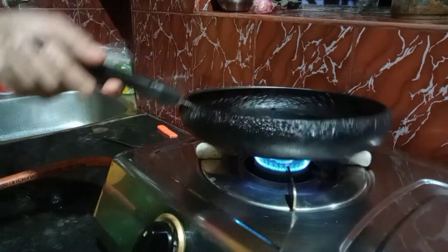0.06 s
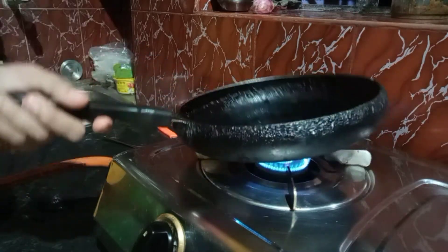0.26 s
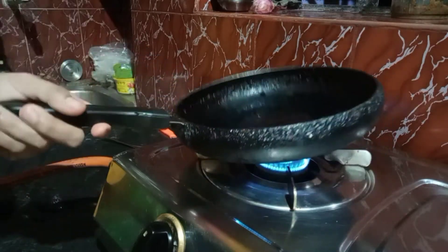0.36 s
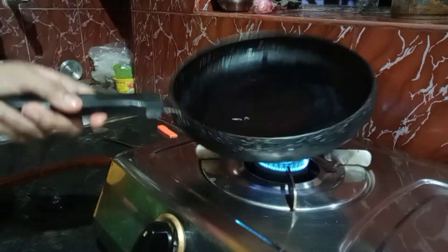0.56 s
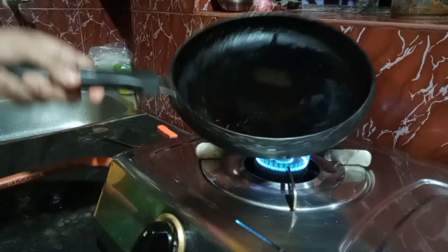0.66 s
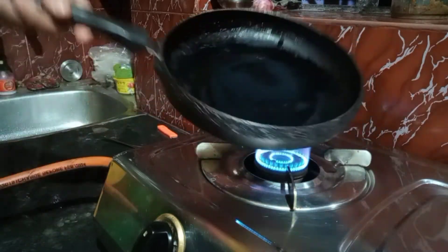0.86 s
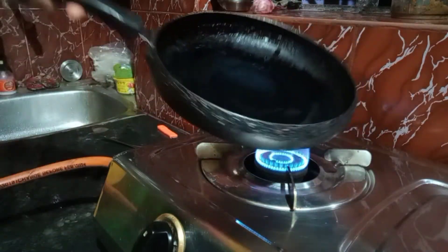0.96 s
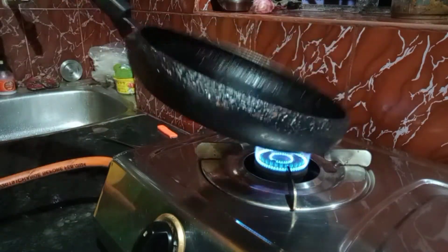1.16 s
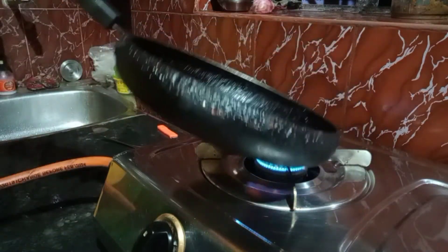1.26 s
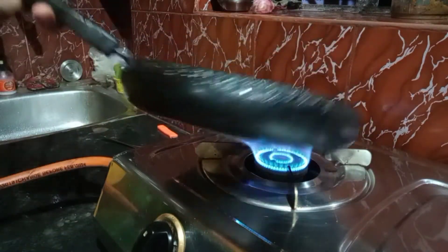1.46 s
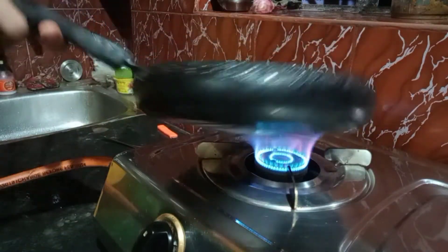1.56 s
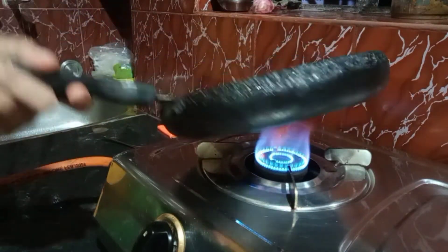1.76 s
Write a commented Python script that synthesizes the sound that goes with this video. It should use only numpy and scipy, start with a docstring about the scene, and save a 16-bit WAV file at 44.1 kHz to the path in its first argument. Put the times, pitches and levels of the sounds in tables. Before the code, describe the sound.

Frying pan dragged over a stove grate with clanks, a thin edge scrape and a bright ting

```python
"""A pan is swirled over a lit gas ring in a small tiled kitchen; the flame, filtered noise, burns throughout.
First the base drags and knocks on the grate: random slips and short contacts ring the pan and the stove.
Then the tilted edge slides with a thin rasp of fine grains, and the rim slips off with a ting of pure modes.
Last the pan drops back, knocks and drags again. Wavering tones squeak and small rim ticks fall along the way."""
import sys
import numpy as np
from scipy import signal
from scipy.fft import rfft, irfft
from scipy.io import wavfile
from scipy.ndimage import uniform_filter1d

SR = 44100
rng = np.random.default_rng(int(sys.argv[2]) if len(sys.argv) > 2 else 0)


def inscribe(sig):
    """Save sig as 16-bit PCM at rate SR to the path in sys.argv[1].

    A 1-D sig is mono; a 2-D sig holds one channel per row.
    Samples are clipped to [-1, 1] before scaling.
    """
    pcm = np.round(np.clip(np.atleast_2d(sig).T, -1, 1) * 32767)
    wavfile.write(sys.argv[1], SR, pcm.astype(np.int16))


N = 79380
T = np.arange(N) / SR

# Flame hiss and roar colours, relative: pitch_hz, level_db
HISS_COLOUR = [(25, -16), (75, -5.5), (155, 1.5), (200, -3), (300, -4.5), (450, -6), (750, -10), (900, -6),
               (1050, -11), (1400, -2), (1850, -13), (2400, -10.5), (3000, -14.5), (3750, -6.5),
               (5200, -20), (6550, 1), (8000, -20.5), (10000, -50), (12500, -32), (15500, -30)]
ROAR_COLOUR = [(30, -24), (60, -13), (90, 1.5), (125, -3), (155, -2), (200, -12), (300, -21), (700, -33),
               (2000, -64), (8000, -90)]
# Roar of the flame as the pan covers it: time_s, level_db
ROAR_LEVEL = [(0, -52), (.15, -70), (.28, -43), (.48, -53.5), (.58, -71), (.67, -58), (.8, -86), (.94, -61),
              (1.07, -64), (1.22, -63), (1.33, -50.5), (1.52, -44), (1.68, -60), (1.78, -53)]
# Sliding metal groans or squeaks on one note: start_s, length_s, pitch_hz, level_db (peak)
SQUEAKS = [(0, 0.14, 268, -39.5), (0, 0.091, 1012, -46), (0.124, .21, 271, -23.5), (0.228, 0.1, 395, -34),
           (0.165, 0.043, 678, -27.5), (0.394, 0.12, 1000, -40.5), (0.432, 0.12, 706, -47.5),
           (0.544, 0.065, 1963, -59), (0.688, 0.027, 3530, -41), (0.736, 0.042, 4095, -25),
           (1.139, 0.1, 3660, -51.5), (1.209, 0.095, 2420, -60.5), (1.345, 0.032, 1075, -28),
           (1.348, 0.083, 1359, -25.5), (1.35, 0.068, 686, -28), (1.513, .13, 365, -45.5),
           (1.62, 0.067, 4520, -54), (1.66, 0.16, 3770, -54)]
# Light ticks of the rim: start_s, level_db, ring_s (t60 given to wash)
RIM_TICKS = [(0.461, -22.5, .08), (.648, -30, 0.12), (1.526, -18, 0.031), (1.662, -26.5, .25),
             (1.759, -36, .06)]
# Modes of the rim, with starting level: pitch_hz, level_db, t60_s
RIM_MODES = [(3700, -27, 0.2), (6912, -15, .27), (7467, -12, .35), (7550, -10.5, 0.23), (10120, -18, 0.34),
             (11360, -25, 0.37), (12400, -20, 0.26), (12810, -9, 0.29), (13510, -22, .19),
             (14010, -2.5, 0.28), (14590, -9, 0.24), (15400, -8, 0.19)]
# Colour of the rim's contacts, relative: pitch_hz, level_db
TICK_COLOUR = [(1500, -20.5), (4000, -20), (7000, 4), (9500, -27), (12500, -6), (15500, -4.5)]
# Modes of stove top with grate, and of the pan, relative in energy: pitch_hz, level_db, t60_s
STOVE_MODES = [(273.8, -0.5, 0.16), (306.6, -9.5, 0.054), (363.7, -6.5, 0.11), (417.5, -3, 0.17),
               (626, -8.5, 0.049), (686, -3.5, 0.26), (791, -15, 0.061), (1049, -17, 0.2),
               (1118.4, -13.5, .17), (1197.5, -8.5, 0.054), (1375, -15.5, 0.37), (2233, -15, 0.15),
               (2680, -22.5, 0.6)]
PAN_MODES = [(3238, -1, 0.075), (3577, -8, 0.04), (3770, 4, 0.26), (3738, 10.5, 0.061), (3790, -5, .12),
             (4240, -9, 0.092), (4240, 1, 0.18), (5980, 18, 0.052), (6290, -9, .15), (6740, -1, 0.3)]
# Pan knocks on the grate: start_s, clack_db (in the pan), thud_db (in the stove), hardness_hz (contact low-pass)
KNOCKS = [(0.1115, 11.5, -5.5, 9700), (0.155, -1, -1, 15000), (0.187, 4, -3, 9300),
          (0.2882, -1.5, 0.5, 9000), (0.3206, -1.5, -8, 8800), (1.349, 8, 0.5, 2600),
          (1.3626, 2, -1.5, 9000), (1.4465, 0, -5, 9000)]
# Tilted edge slides: time_s, level_db
EDGE_SLIDE = [(.688, -54), (.696, -44.5), (.712, -33.5), (.734, -21.5), (.785, -24.5), (.84, -24),
              (.89, -31), (.94, -37), (1.0, -40), (1.05, -48), (1.12, -58)]
# Base drags on the grate, twice: time_s, judder_db (low), grit_db
FIRST_DRAG = [(0, -35.5, -38.5), (.042, -55, -48), (.064, -41.5, -40), (.10, -50, -57.5), (.148, -31, -24),
              (.158, -23.5, -20.5), (.2, -29, -24), (.28, -28.5, -29.5), (.338, -32.5, -34),
              (.38, -36, -44.5), (.43, -40.5, -36), (.494, -55.5, -42.5), (.54, -62, -58)]
SECOND_DRAG = [(1.348, -41, -58), (1.364, -29, -23.5), (1.39, -27.5, -26.5), (1.438, -29, -35),
               (1.45, -29, -33.5), (1.53, -35.5, -38.5), (1.57, -43.5, -51), (1.62, -61, -53)]
# Colours of judder, grit, edge rasp and finest crackle, relative: pitch_hz, level_db
JUDDER_COLOUR = [(40, -36), (85, -4.5), (185, -14.5), (270, -2), (420, 1.5), (510, -0.5), (700, -2),
                 (1200, 0.5), (1700, -6), (3000, -47), (9000, -76)]
GRIT_COLOUR = [(200, -28), (600, -15), (1100, 3.5), (1500, -5.5), (2000, -6.5), (2900, 0.5), (3400, -2.5),
               (4150, 4.5), (5100, -5), (6700, -3), (8300, -22.5), (10000, -34), (12500, -34), (15500, -16)]
RASP_COLOUR = [(100, -72), (500, -73), (1050, -31), (1400, -10), (1700, -6), (2300, -10.5), (3100, 1.5),
               (3800, 2.5), (4800, -2), (6700, 2.5), (8100, -20), (10500, -28), (12500, -20),
               (15300, -13.5)]
FIZZ_COLOUR = [(5000, -23), (8000, -3), (10500, -8), (12500, 1), (15500, -1.5)]

HISS_DB = -55
KITCHEN_T60_S, KITCHEN_DB, KITCHEN_DULL_HZ, KITCHEN_BUILD_S = 0.36, -10, 7240, 0.0088   # t60 given to wash
SQUEAK_WAVER, SQUEAK_WAVER_S = 0.0294, 0.00308   # rms share of pitch; smoothing time of the swerves
TING_S, TING_DB = 0.9587, -30
TING_CRACK_DB, TING_CRACK_T60_S = -4, 0.45   # t60 given to wash
TICK_CLICK_S, TICK_CLICK_DB = 0.008, -9   # the contact itself: t60 given to wash; level relative to its ring
CONTACT_S = 0.017   # chatter of a knock, t60 given to wash
JUDDERS_PER_S, GRAINS_PER_S, RASP_GRAINS_PER_S = 500, 1500, 3000   # average rates
FIZZ_DB, FIZZ_GROWTH = 4, 2.19   # gain; dB of crackle per dB of grit
LOW_CUT_HZ, HIGH_CUT_HZ = 53, 15800


def from_db(db):
    """Decibels to gain."""
    return 10 ** (np.asarray(db) / 20)


def unit(x):
    """Scale to an energy of one."""
    return x / np.sqrt(np.sum(x ** 2) + 1e-20)


def through(x, response):
    """Pass a sound through an impulse response."""
    return signal.fftconvolve(x, response)[:N]


def low_pass(x, cutoff_hz):
    """Dull a sound with a second-order low-pass."""
    return signal.sosfilt(signal.butter(2, cutoff_hz, fs=SR, output="sos"), x)


def level(rows, column=1):
    """Gain over time from a column of dB; practically silent (-120 dB) outside the curve."""
    rows = np.array(rows)
    times, db = rows[:, 0], rows[:, column]
    before = -120 if times[0] > 0.1 else db[0]   # a curve near the start is already sounding
    return from_db(np.interp(T, times, db, left=before, right=-120))


def colour(x, spectrum, size=8192):
    """Filter of unit energy with the given spectrum, made minimum-phase so that it answers at once."""
    hz, db = np.transpose(spectrum)
    grid = np.maximum(np.arange(size // 2 + 1) * SR / size, 1)
    gain = from_db(np.interp(np.log(grid), np.log(hz), db))
    # folding the cepstrum forward in time gives the minimum phase
    cepstrum = irfft(np.log(gain))
    cepstrum[1:size // 2] *= 2
    cepstrum[size // 2 + 1:] = 0
    response = irfft(np.exp(rfft(cepstrum)))
    return through(x, unit(response))


def dying(t60):
    """Envelope that loses 60 dB in t60."""
    return np.exp(-np.log(1000) * T / t60)


def wash(t60):
    """Dense noise ring of even spectrum; a second, slower fade shortens its decay to about 0.8 t60."""
    spectrum = rfft(rng.standard_normal(N) * dying(t60))
    smooth_power = uniform_filter1d(np.abs(spectrum) ** 2, size=500)
    even = irfft(spectrum / np.sqrt(smooth_power + 1e-12), N)
    return unit(even * dying(4 * t60))


def ringing(modes):
    """A body's response as decaying sines of set energy, alternating in sign."""
    response = np.zeros(N)
    for k, (hz, db, t60) in enumerate(modes):
        mode = unit(np.sin(2 * np.pi * hz * T) * dying(t60))
        response += from_db(db) * (-1) ** k * mode
    return response


def blow(time_s, db):
    """One click for one contact."""
    out = np.zeros(N)
    out[int(time_s * SR)] = from_db(db)
    return out


def slips(per_s, spread_db, even_s=0.02):
    """Stick-slip: random clicks of uneven size, evened to a local rms near 1 as under steady pressure."""
    size_db = spread_db * np.minimum(rng.exponential(1, N), 4)
    sizes = from_db(size_db) * rng.choice([-1, 1], N)
    clicks = sizes * (rng.random(N) < per_s / SR)
    local_power = np.abs(uniform_filter1d(clicks ** 2, int(even_s * SR)))
    return clicks / np.sqrt(local_power + 1e-4)


def metal(force, spectrum, modes, wash_t60, wash_db, modes_db):
    """A force on sheet metal gives a crack, a short dense ring and the clear modes."""
    crack = T == 0
    body = colour(from_db(wash_db) * wash(wash_t60) + crack, spectrum)
    response = unit(body) + from_db(modes_db) * unit(ringing(modes))
    return through(force, unit(response))


def flame():
    """Gas flow as steady hiss, plus a low roar that rises and falls as the pan covers it."""
    hiss = from_db(HISS_DB) * colour(rng.standard_normal(N), HISS_COLOUR)
    roar_gain = from_db(np.interp(T, *np.transpose(ROAR_LEVEL)))
    roar = roar_gain * colour(rng.standard_normal(N), ROAR_COLOUR)
    return hiss + roar


def kitchen(pan):
    """The room's reflections as a dull noise tail that builds up and dies."""
    tail = unit(wash(KITCHEN_T60_S) * (1 - np.exp(-T / KITCHEN_BUILD_S)))
    return from_db(KITCHEN_DB) * through(pan, low_pass(tail, KITCHEN_DULL_HZ))


def squeaks():
    """Friction locks on to one resonance: a rough tone of wavering pitch that swells and dies."""
    out = np.zeros(N)
    for start_s, length_s, hz, db in SQUEAKS:
        waver = uniform_filter1d(rng.standard_normal(N), int(SQUEAK_WAVER_S * SR))
        pitch = hz * (1 + SQUEAK_WAVER * waver / waver.std())
        tone = np.sin(2 * np.pi * np.cumsum(pitch) / SR)
        swell = np.sin(np.pi * np.clip((T - start_s) / length_s, 0, 1))
        out += from_db(db) * tone * swell
    return out


def rim():
    """The rim slips off a prong and rings in its modes; elsewhere it ticks as a click with a noisy ring."""
    bell = sum(from_db(db) * np.sin(2 * np.pi * hz * T) * dying(t60) for hz, db, t60 in RIM_MODES)
    ting = through(blow(TING_S, TING_DB), bell)
    ticks = np.zeros(N)
    for start_s, db, ring_s in [(TING_S, TING_CRACK_DB, TING_CRACK_T60_S)] + list(RIM_TICKS):
        touch = wash(ring_s) + from_db(TICK_CLICK_DB) * wash(TICK_CLICK_S)
        ticks += through(blow(start_s, db), touch)
    return ting + colour(ticks, TICK_COLOUR)


def edge():
    """The tilted edge's fine stick-slip rasps in the pan without shaking the stove."""
    force = slips(RASP_GRAINS_PER_S, spread_db=1.0) * level(EDGE_SLIDE)
    return metal(force, RASP_COLOUR, PAN_MODES, wash_t60=0.041, wash_db=3.0, modes_db=-15.0)


def knocks():
    """A brief chatter, duller for soft contacts, clacks in the pan; a single blow thuds in the stove."""
    clack, thud = np.zeros(N), np.zeros(N)
    for start_s, clack_db, thud_db, hardness_hz in KNOCKS:
        chatter = low_pass(wash(CONTACT_S), hardness_hz)
        clack += through(blow(start_s, clack_db), chatter)
        thud += blow(start_s, thud_db)
    return (metal(clack, GRIT_COLOUR, PAN_MODES, wash_t60=0.17, wash_db=4.0, modes_db=-21.0)
            + metal(thud, JUDDER_COLOUR, STOVE_MODES, wash_t60=0.036, wash_db=0.0, modes_db=10.0))


def drags():
    """The base judders over the grate, shaking the stove; grit excites the pan and fizzes under load."""
    shake = level(FIRST_DRAG, column=1) + level(SECOND_DRAG, column=1)
    load = level(FIRST_DRAG, column=2) + level(SECOND_DRAG, column=2)
    judder = slips(JUDDERS_PER_S, spread_db=3.0) * shake
    grains = slips(GRAINS_PER_S, spread_db=2.5)
    stove = metal(judder, JUDDER_COLOUR, STOVE_MODES, wash_t60=0.025, wash_db=-16.0, modes_db=4.0)
    grit = metal(grains * load, GRIT_COLOUR, PAN_MODES, wash_t60=0.055, wash_db=8.0, modes_db=-14.0)
    # the finest crackle grows faster than the grit
    crackle = through(grains * load ** FIZZ_GROWTH, wash(0.035))
    fizz = from_db(FIZZ_DB) * colour(crackle, FIZZ_COLOUR)
    return stove + grit + fizz


def scene():
    """Pan and stove with the kitchen's dull reverberation, over the dry flame."""
    pan = drags() + knocks() + edge() + squeaks() + rim()
    return (pan + kitchen(pan) + flame())[None]


def record(dry):
    """The microphone loses the deep bass; the top is cut steeply."""
    bass_cut = signal.butter(2, LOW_CUT_HZ, "high", fs=SR, output="sos")
    thin = signal.sosfilt(bass_cut, dry)
    top_cut = signal.firwin(401, HIGH_CUT_HZ, fs=SR)
    return signal.fftconvolve(thin, top_cut[None], mode="same")


dry = scene()
out = record(dry)
inscribe(out)
```